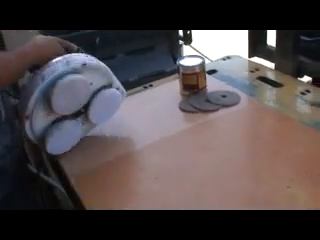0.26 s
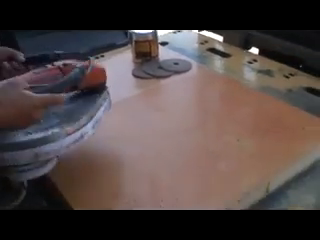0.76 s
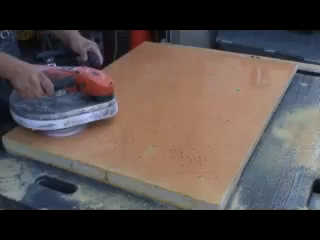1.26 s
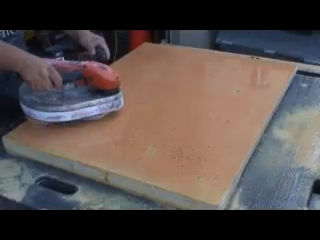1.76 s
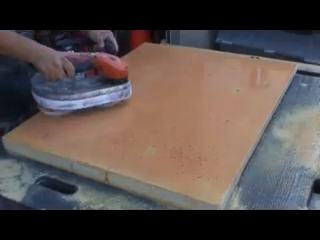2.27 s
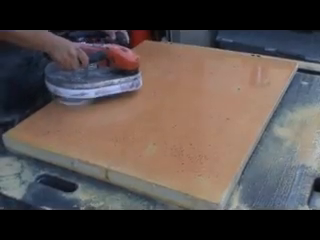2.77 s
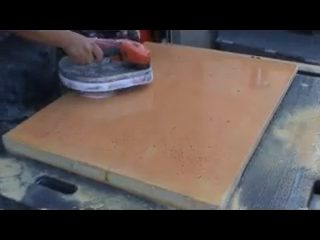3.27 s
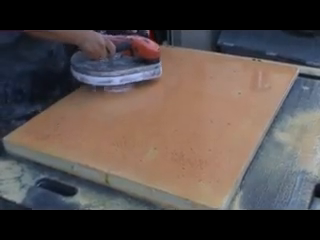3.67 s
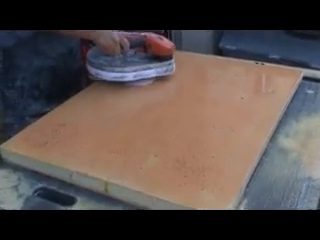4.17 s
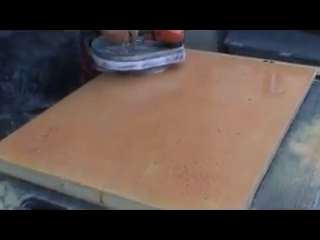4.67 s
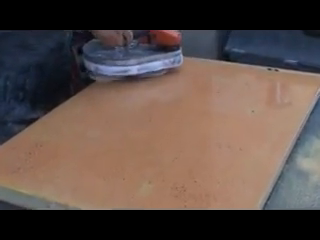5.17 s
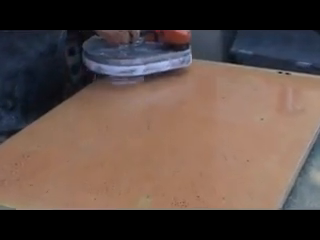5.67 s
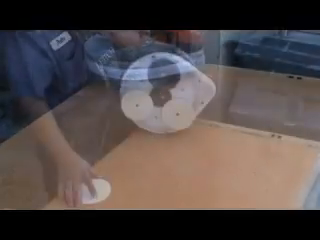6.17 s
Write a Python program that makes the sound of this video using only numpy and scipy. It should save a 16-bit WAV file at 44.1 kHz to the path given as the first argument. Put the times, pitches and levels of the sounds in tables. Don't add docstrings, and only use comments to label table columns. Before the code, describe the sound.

Low room rumble, a stiff clack and cloth brushes, then suddenly a handheld polisher grinds loudly on a wet slab before dissolving back toward room hum.

```python
import sys
import numpy as np
from scipy import signal
from scipy.fft import rfft, irfft, next_fast_len
from scipy.io import wavfile
from scipy.ndimage import uniform_filter1d, map_coordinates

SR = 44100
rng = np.random.default_rng(int(sys.argv[2]) if len(sys.argv) > 2 else 0)


def wav_record(signal):
    frames = np.transpose(np.atleast_2d(signal))
    bounded = np.clip(frames, -1, 1)
    quanta = np.round(bounded * 32767).astype(np.int16)
    wavfile.write(sys.argv[1], SR, quanta)


def how_loud(loudness_db):
    steps = np.asarray(loudness_db, float) / 20
    return 10 ** steps


N = 283122

CUT_S = 1.2482
DISSOLVE_S, DISSOLVE_DB_PER_S = 5.86, 16

# (frequency [Hz], width [Hz], level [dB])
ROOM_MODES = [(56, 11, -0.5), (72, 17, -7), (104, 9.9, 0.5), (150.6, 7.7, -2.5), (163, 6.4, -6.5),
              (300, 15, -10), (350, 14, -15.5), (386, 20, -19)]
# (frequency [Hz], density [dB per Hz])
SHOP_AIR = [(120, -10.5), (200, -5.5), (322, -14.5), (371, -1.5), (466, -11.5), (576, -9), (711, -14),
            (1140, -15.5), (10000, -39), (11800, -41), (13500, -60.5)]
SHOP_AIR_DB = -44.5
SHOP_DB, SETTLE_DB = -37, 2.5
DUCKED_DB, CREEP_DB_PER_S, RETURN_DB_PER_S = -66, 1.5, 17
# (frequency [Hz], left-right likeness [-1 to 1])
SHOP_LIKENESS = [(60, 0.89), (180, 1), (540, 0.69), (1610, 0.53), (4840, 0.75), (14500, 0.21)]

# (frequency [Hz], density [dB per Hz])
CLOTH = [(880, -41), (1500, -16), (1820, -6), (2090, -15), (2910, -6), (12200, -21), (13500, -31)]
# (peak time [s], level [dB], rise [s], fall [s])
STROKES = [
    (.56, -54, .012, 0.019),
    (.63, -53, 0.048, 0.053),
    (.8, -54, 0.068, .035),
    (.92, -56.5, .07, 0.19),
    (1.21, -58, .04, .05),
]
# (time [s], peak level [dB], brightness [dB per octave])
CLICKS = [
    (.5458, -29, 2.5),
    (.5520, -26, -9),
    (.606, -44, 4),
    (.6155, -41, 2),
    (.631, -46, 5),
    (.644, -45, 4),
]
# (frequency [Hz], level [dB], 60 dB decay [s])
PART_MODES = [(700, -12, .03), (1050, -12, .03), (1486, -3, .065), (2003, -1, .035), (2250, -2, .045),
              (3000, -9, .02), (3700, -12, .02), (4850, -8, .03), (7300, -18, .02)]

# (time [s], shaft speed [Hz])
SPEED = [(1.26, 435.3), (1.8, 438.8), (2.2, 442.0), (2.8, 445.0), (3.2, 445.4), (3.82, 448.8), (4.0, 446.9),
         (4.2, 443.1), (4.56, 438.3), (5.0, 445.3), (5.42, 453.2), (5.6, 449.1), (6.0, 444.9),
         (6.42, 437.5)]
# (multiple of shaft speed [ratio], level [dB], loudest time [s])
SHAFT_LINES = [(1, -50, 4.8), (4, -46, 4.0), (5, -50, 2.0), (5, -50, 5.6), (8, -51, 3.2), (8.18, -50, 2.2),
               (8.79, -52, 5.4), (9.2, -52, 4.7), (10, -52, 5.2), (10.22, -49, 5.4), (11.77, -56, 3.0),
               (12, -53, 2.9), (12, -52, 5.2), (14, -55, 3.2), (22, -57, 1.8), (24, -59, 2.0)]
MESH_DB, OVERTONE_DB, BARS_DB = -53, -56, -52.5
# (multiple of shaft speed [ratio], middle time [s], half length [s], level [dB])
FLARES = [(9, 1.64, .22, -41), (9, 2.05, .08, -40), (9, 2.45, .2, -46), (9, 3.2, .3, -45),
          (9, 3.73, .08, -41), (9, 4.75, .15, -47), (9, 5.17, .07, -46), (9, 5.8, .16, -40),
          (9, 6.08, .2, -41), (18, 1.55, .25, -50), (18, 2.6, .6, -45), (18, 3.6, .45, -47),
          (18, 4.55, .2, -50), (18, 5.3, .3, -50), (31, 1.3, .1, -49), (31, 3.0, .3, -49),
          (31, 3.75, .4, -45), (31, 5.3, .5, -47)]

# (frequency [Hz], width [Hz], near level [dB], far level [dB])
HOUSING = [(448, 37, -13, -6), (522, 57, -6, -21), (620, 79, -8.5, -11.5), (768, 105, 0.5, 0),
           (879, 118, -2, -0.5), (1097, 176, -2, -1.5), (1310, 125, -10, -9), (1389, 102, -7.5, -2),
           (1526, 410, -9.5, -5)]
# (frequency [Hz], width [Hz], level [dB])
SLAB = [(314.6, 70, -1.5), (371, 96, -7), (462, 88, -3)]
SLAB_GAP_HZ = 415
# (frequency [Hz], width [Hz], level [dB])
COVER = [(1395, 55, 0)]
# (time [s], half length [s], level [dB])
COVER_RINGS = [
    (2.25, 0.16, -31),
    (3.85, 0.078, -25.5),
    (4.75, .33, -29),
]
# (frequency [Hz], density [dB per Hz])
GRIND = [(880, -35), (1500, -5), (1670, -10.5), (1830, -3), (2780, -8), (3510, -6), (4090, -11),
         (4910, -21.5), (5600, -21.5), (7280, -24), (12300, -120)]
# (frequency [Hz], density [dB per Hz])
TOOL_AIR = [(2650, -26), (4500, -3.5), (4950, -8.5), (6170, -4.5), (6840, -8), (8080, -3.5), (8840, -8),
            (11800, -10.5), (13200, -16.5)]
ROAR_DB = -21.5
# (near corner [dB], far corner [dB])
GRIND_DB = (-8, -9)
AIR_DB = (-17, -15)
DRONE_DB = (-18, -12)
# (time [s], way across the slab [0 to 1])
ACROSS = [(1.25, 0.08), (2.0, 0.14), (2.4, 0.38), (3.0, 0.25), (3.7, 0.52), (4.7, 0.82), (6.4, 0.76)]
# (time [s], drop [dB], length [s])
EASES = [(1.82, 1.5, 0.059), (1.958, 0.5, 0.055), (2.566, 0.5, 0.021), (2.876, 1, 0.044), (3.44, 1.2, 0.17),
         (3.957, 2, 0.022), (4.414, 1.5, 0.025), (5.298, 3.5, 0.029), (5.948, 4, 0.017)]
# (frequency [Hz], left-right likeness [-1 to 1])
TOOL_LIKENESS = [(60, 0.7), (180, 0.91), (540, 0.98), (1610, 0.93), (4840, 0.85), (14500, 0.78)]

# (frequency [Hz], left over right [dB])
LEFT_DB = [(60, 5.8), (180, 5.5), (540, 1.6), (1610, 0.92), (4840, 1.2), (14500, 1.7)]
# (frequency [Hz], left lead [radians])
LEFT_LEAD = [(60, 0.33), (380, -0.71), (1700, -0.016), (7000, -0.19)]
STEREO_TOP_HZ = 11400
QUIET_TOP_HZ, BUSY_TOP_HZ, TOOL_TOP_HZ, WHINE_TOP_HZ = 12550, 13200, 13820, 14470
TOP_OPENS_HZ, TOP_SHUTS_S = 441, 6.05


def unit(x):
    return x / np.sqrt(np.mean(x ** 2) + 1e-20)


def along(points, hz):
    f, v = np.transpose(points)
    return np.interp(np.log(hz + 1), np.log(f + 1), v)


def curves(rows):
    s, *columns = np.transpose(rows)
    return [np.interp(np.arange(N) / SR, s, column) for column in columns]


def wobble(rate):
    knots = rng.standard_normal(int(N * 80 / SR) + 4)
    return map_coordinates(knots, [np.arange(N) * min(rate, 80) / SR])


def bump(s, rise, fall):
    t = np.arange(N) / SR - s
    return np.exp(-(t / np.where(t < 0, rise, fall)) ** 2)


def fade_db():
    return -DISSOLVE_DB_PER_S * np.maximum(np.arange(N) / SR - DISSOLVE_S, 0)


def filtered(x, response):
    size = next_fast_len(N + 8192)
    return irfft(rfft(x, size) * response(np.fft.rfftfreq(size, 1 / SR)), size)[..., :N]


def modes(rows):
    def gain(f):
        return np.sqrt(sum(np.abs(how_loud(db) * f * w / (c * c - f * f + 1j * f * w)) ** 2
                           for c, w, db in rows))
    return gain


def shape(points):
    return lambda hz: how_loud(along(points, hz))


def rush(gain, likeness, patchy_db, grit=0):
    raw = rng.standard_normal((2, N)) * how_loud(grit * np.minimum(rng.exponential(size=N), 5))
    z = signal.stft(raw, nperseg=512)[2]
    patches = uniform_filter1d(rng.standard_normal(z.shape[1:]), size=8, axis=0)
    patches = uniform_filter1d(patches, size=8, axis=1)
    pair = signal.istft(z * how_loud(patchy_db * unit(patches)), nperseg=512)[1][:, :N]

    def mid_side(hz):
        turn = np.arccos(np.clip(along(likeness, hz), -1, 1)) / 2
        return gain(hz) * np.array([np.cos(turn), np.sin(turn)])

    mid, side = filtered(pair, mid_side)
    return unit(np.array([mid + side, mid - side]))


def workshop(before):
    t = np.arange(N) / SR
    return_db = -fade_db() * RETURN_DB_PER_S / DISSOLVE_DB_PER_S
    under_db = DUCKED_DB + CREEP_DB_PER_S * (t - CUT_S) + return_db
    open_db = SHOP_DB - SETTLE_DB * np.exp(-t / 0.25)
    rumble_db = under_db + (open_db - under_db) * np.clip((CUT_S + 0.01 - t) / 0.0084, 0, 1)

    def room(hz):
        return modes(ROOM_MODES)(hz) ** 0.98 / np.sqrt(1 + (28 / (hz + 1)) ** 4)

    rumble = how_loud(rumble_db - 0.3 + 0.4 * wobble(14)) * rush(room, SHOP_LIKENESS, patchy_db=0)
    air_db = np.where(before, SHOP_AIR_DB, rumble_db + 4)
    return rumble + how_loud(air_db) * rush(shape(SHOP_AIR), SHOP_LIKENESS, patchy_db=0.5)


def rustle():
    return sum(how_loud(db) * bump(s, rise, fall) for s, db, rise, fall in STROKES)


def click(peak_db, tilt_db):
    t = np.arange(SR // 8) / SR
    ring = 0
    for hz, level_db, t60 in PART_MODES:
        decay = how_loud(level_db + tilt_db * np.log2(hz / 1500) - 60 * t / t60)
        ring = ring + decay * np.sin(2 * np.pi * (hz * t + rng.random()))
    noise = uniform_filter1d(rng.standard_normal(len(t)), size=5)
    crack = how_loud(1.5 * tilt_db - 60 * t / 0.02) * noise
    onset = 1 - np.exp(-t / 0.0003)
    return how_loud(peak_db - 6) * (ring + crack) * onset


def hands():
    cloth = rush(shape(CLOTH), SHOP_LIKENESS, patchy_db=1.5, grit=2.9)
    out = how_loud(3.0) * rustle() * (np.arange(N) < CUT_S * SR) * cloth
    for s, peak_db, tilt_db in CLICKS:
        snap = click(peak_db, tilt_db)
        start = round(s * SR)
        out[:, start:start + len(snap)] += snap
    return out


def motor():
    t = np.arange(N) / SR
    speed, = curves(SPEED)
    slow_turns = np.cumsum(speed) / SR
    sag = 0.0035 * np.sin(2 * np.pi * slow_turns / 27 + wobble(4))
    sag += 0.0009 * wobble(11) + 0.0015 * wobble(45)
    sag_turns = np.cumsum(speed * sag) / SR
    tooth_error = unit(uniform_filter1d(rng.standard_normal(N), size=180))

    def flared(k, steady_db):
        flares = sum(how_loud(2 * db) * bump(s, half, half) ** 2 for m, s, half, db in FLARES if m == k)
        return fade_db() + 10 * np.log10(how_loud(2 * steady_db) + flares)

    def tone(k, db, shake_db, blur, follow):
        turns = k * (slow_turns + follow * sag_turns) + rng.random()
        turns = turns + blur * (wobble(70) + 0.63 * tooth_error)
        return np.sqrt(2) * how_loud(db + shake_db * wobble(45)) * np.sin(2 * np.pi * turns)

    whine = np.zeros(N)
    for k, db, s in SHAFT_LINES:
        facing_db = 1 - 8 * (1 - np.exp(-((t - s) / 0.9) ** 2))
        whine += tone(k, db + fade_db() + facing_db, shake_db=2, blur=0.03, follow=0.3)
    whine += tone(9, flared(9, MESH_DB) + 2.2, shake_db=1.8, blur=0.04, follow=0.3)
    whine += tone(18, flared(18, OVERTONE_DB) - 1.5, shake_db=2, blur=0.2, follow=0.8)
    whine += tone(31, flared(31, BARS_DB) + 1.2, shake_db=2.8, blur=0.14, follow=1)
    return whine, slow_turns


def pads(turns):
    far = np.clip(curves(ACROSS)[0], 0, 1)
    angle = far * np.pi / 2
    ease_db = sum(db * bump(s, length / 2, length * 1.25) for s, db, length in EASES)
    roar_db = ROAR_DB + fade_db() - ease_db
    grind_db, air_db, drone_db = (near + (end - near) * far for near, end in (GRIND_DB, AIR_DB, DRONE_DB))
    load = 0.2 * wobble(14) + 0.75 * wobble(32) + 0.55 * wobble(70)
    load += 0.6 * np.sin(2 * np.pi * turns / 27 + wobble(4))

    def gap(hz):
        return 1 - 0.59 * np.exp(-((hz - SLAB_GAP_HZ) / 25) ** 2)

    def housing(side):
        rows = [(c, w, db[side]) for c, w, *db in HOUSING]
        return rush(lambda hz: modes(rows)(hz) ** 1.36 * gap(hz), TOOL_LIKENESS, patchy_db=0.33, grit=2.2)

    roar = np.cos(angle) * housing(side=0) + np.sin(angle) * housing(side=1)
    roar = how_loud(0.58 + 0.81 * load) * roar
    drone = rush(lambda hz: modes(SLAB)(hz) ** 1.53 * gap(hz), TOOL_LIKENESS, patchy_db=0.1)
    drone = how_loud(drone_db - 3.0 + 0.58 * load) * drone
    grind = rush(shape(GRIND), TOOL_LIKENESS, patchy_db=1.1, grit=2.2)
    grind = how_loud(grind_db + 0.4 * ease_db + 1.05 * load) * grind
    air = rush(shape(TOOL_AIR), TOOL_LIKENESS, patchy_db=1.0, grit=2.4)
    air = how_loud(air_db + 0.5 * ease_db + 1.17 + 1.0 * load) * air
    cover = rush(lambda hz: modes(COVER)(hz) ** 2, TOOL_LIKENESS, patchy_db=1.5)
    cover = cover * sum(how_loud(db) * bump(s, half, half) for s, half, db in COVER_RINGS)
    return how_loud(roar_db) * (roar + drone + grind + air) + cover


def scene():
    t = np.arange(N) / SR
    whine, turns = motor()
    opened = np.clip((t - CUT_S) / 0.0015, 0, 1)
    opened += 0.04 * np.clip((t - CUT_S + 0.014) / 0.004, 0, 1) * (t < CUT_S)
    pan_db = np.outer([0.5, -0.5], np.interp(t, [1.3, 6.0], [0.6, -0.6]))
    tool = opened * how_loud(pan_db) * (pads(turns) + whine)
    return workshop(t < CUT_S) + hands() + tool


def top_cut(x):
    return signal.sosfilt(signal.butter(12, 15090, fs=SR, output="sos"), x)


def record(dry):
    def ports(hz):
        between = how_loud(along(LEFT_DB, hz)) * np.exp(1j * along(LEFT_LEAD, hz))
        return np.array([between ** side for side in (0.5, -0.5)])

    heard = filtered(dry, ports)
    heard = heard / (1 + np.abs(heard / 0.47) ** 5) ** (1 / 5)
    hz, t, z = signal.stft(heard, SR, nperseg=2048)
    frame = np.minimum(t * SR, N - 1).astype(int)
    busy = (rustle() * how_loud(60) + 0.9 * wobble(8))[frame] > 0.6
    shop_top = np.where(busy, BUSY_TOP_HZ, QUIET_TOP_HZ)
    fast = (curves(SPEED)[0] + 1.6 * wobble(25))[frame] - TOP_OPENS_HZ
    opening = np.clip(fast / 1.5 + 0.5, 0, 1) * (t < TOP_SHUTS_S)
    tool_top = TOOL_TOP_HZ + (WHINE_TOP_HZ - TOOL_TOP_HZ) * opening - 40 * np.abs(wobble(30)[frame])
    top = np.where(t < CUT_S - 0.01, shop_top, tool_top)
    narrow = 0.8 * z.mean(axis=0) + 0.2 * z
    z = np.where(hz[:, None] > STEREO_TOP_HZ, narrow, z)
    z = z * (hz[:, None] < top)
    mix = signal.istft(z, SR, nperseg=2048)[1][:, :N]
    return top_cut(mix)


dry = scene()
out = record(dry)
wav_record(out)
```